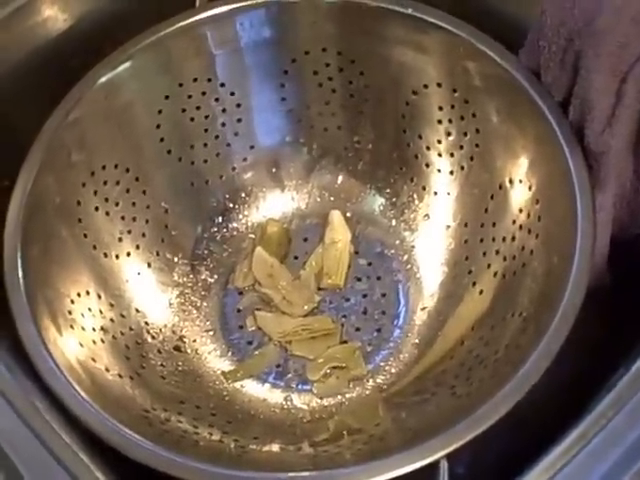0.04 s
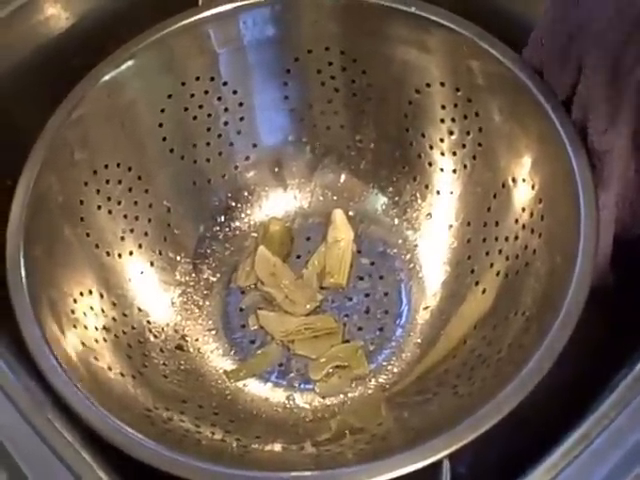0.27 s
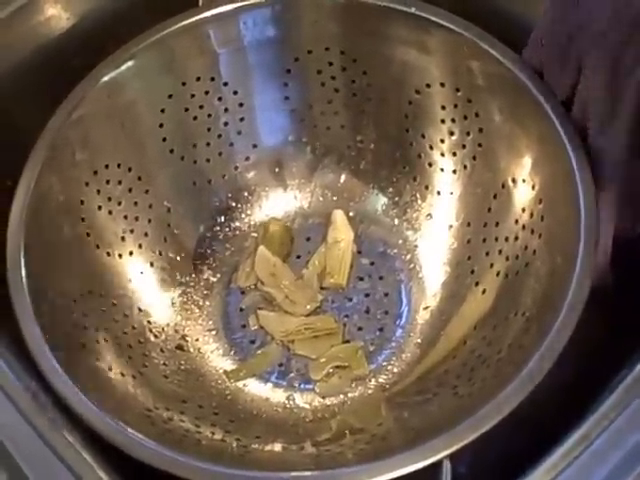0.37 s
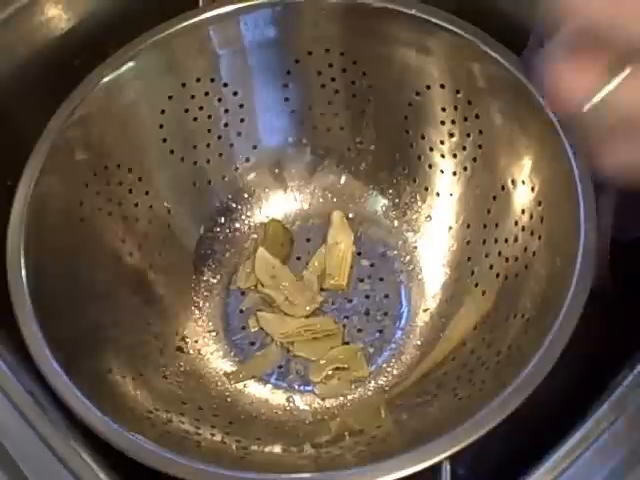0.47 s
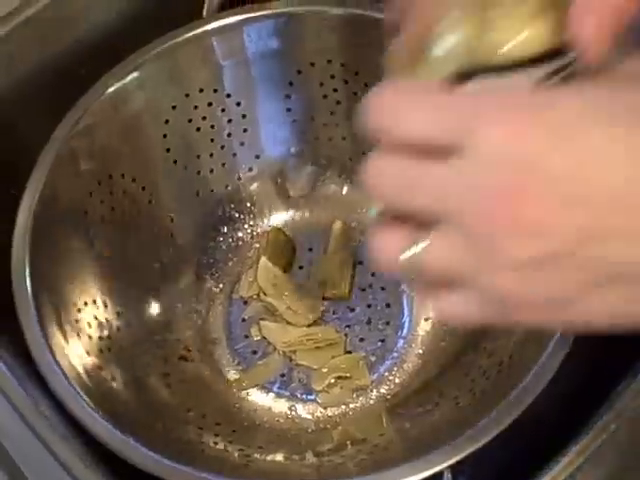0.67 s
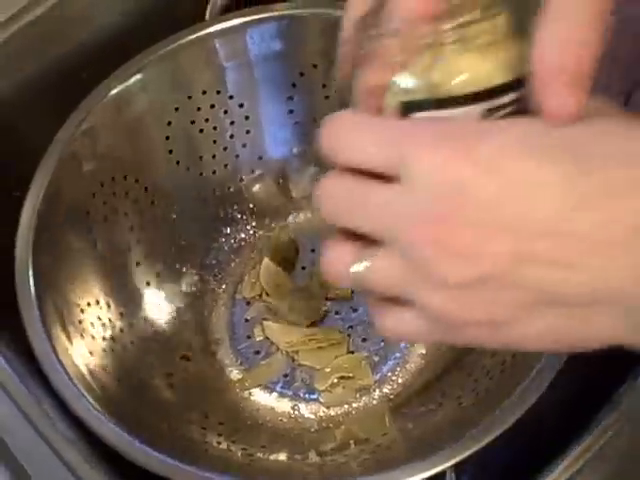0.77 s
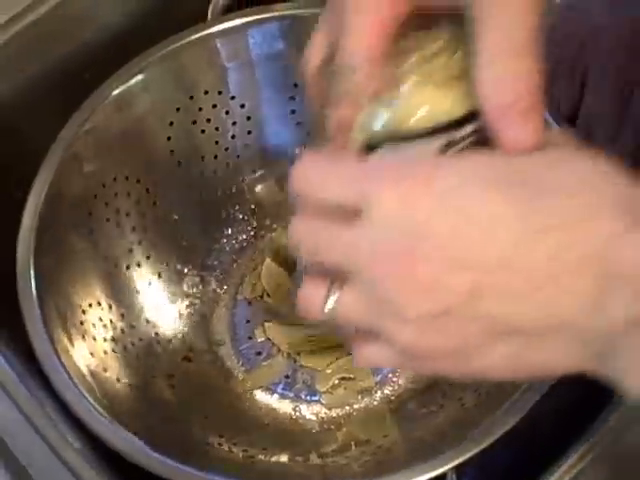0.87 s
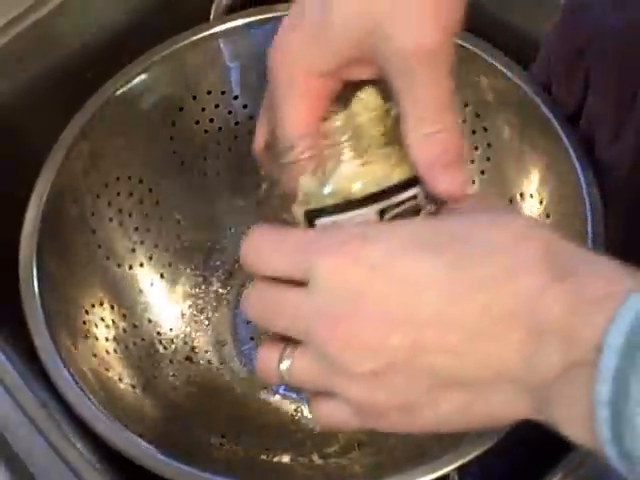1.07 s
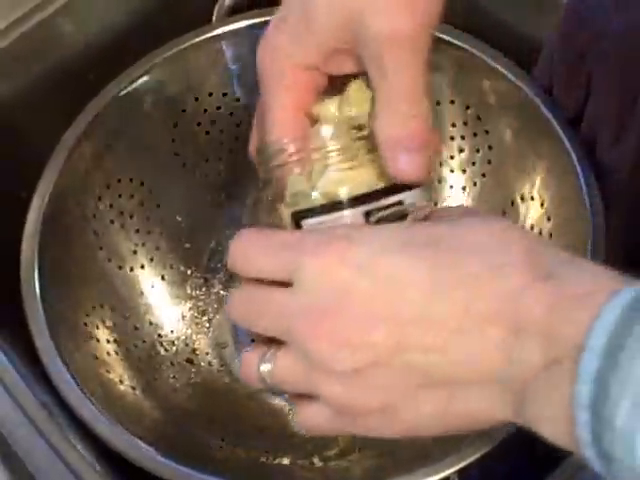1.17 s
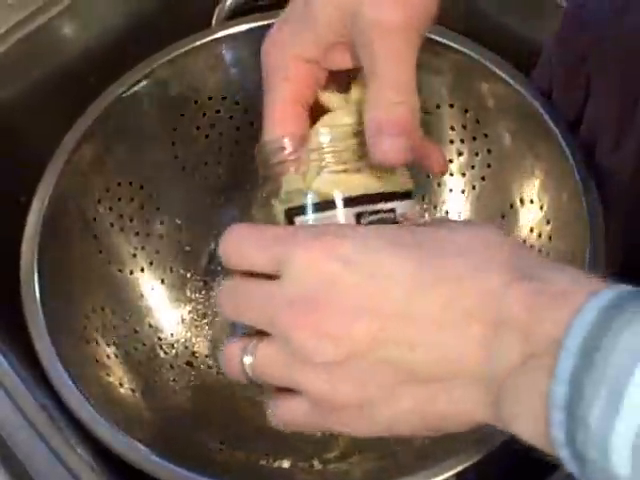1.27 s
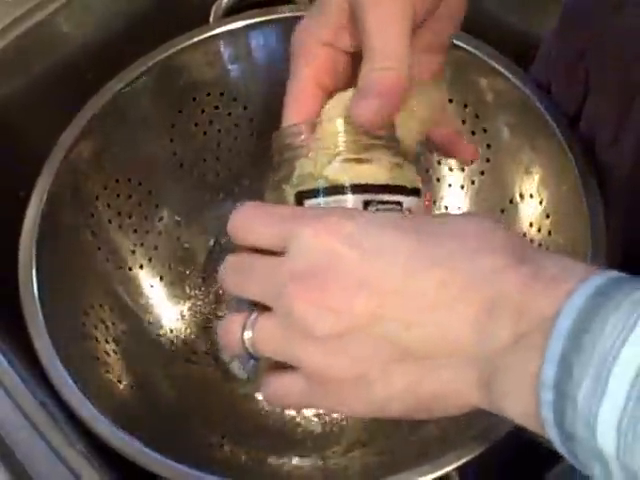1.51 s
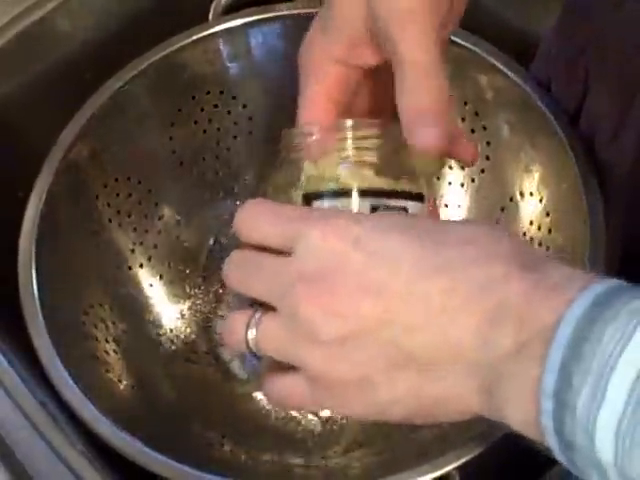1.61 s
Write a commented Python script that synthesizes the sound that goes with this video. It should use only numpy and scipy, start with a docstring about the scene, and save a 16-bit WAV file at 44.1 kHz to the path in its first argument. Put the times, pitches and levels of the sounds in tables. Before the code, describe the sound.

A metal lid thuds and clatters sharply in a small kitchen, followed by faint squishy wet ticks

```python
"""A metal jar lid is worked loose with dull knocks, drops and clatters on the counter of a small hard kitchen.
Each hit is a short rattle of banded noise; the blows also ring decaying modes, and a colander hums.
Wet fingers then dig into pickled vegetables: fizz of tiny bubbles, rubbed glass and resonant brine ticks.
Faint finger slides come first, over rumble and microphone hiss; a steep limiter flattens the loudest hits."""
import sys
import numpy as np
from scipy import signal
from scipy.fft import rfft, irfft, next_fast_len
from scipy.io import wavfile

SR = 44100
rng = np.random.default_rng(int(sys.argv[2]) if len(sys.argv) > 2 else 0)


def materialize(psi):
    """Save the field psi as 16-bit PCM at rate SR to the path in sys.argv[1].

    A 1-D psi becomes a single channel; in a 2-D psi each row is a channel.
    """
    bounded = np.clip(np.atleast_2d(psi).T, -1, 1)
    quanta = np.round(bounded * 32767).astype(np.int16)
    wavfile.write(sys.argv[1], SR, quanta)


N = 72765

# Room rumble and microphone hiss: f/Hz, spectrum level/dB
FLOOR_SPECTRUM = [(12, -29.5), (20, -2.5), (88, -4.5), (221, -13.5), (1320, -24), (1560, -25.5),
                  (1690, -25), (2000, -27.5), (3310, -32), (15800, -36.5)]
FLOOR_DB = -54  # overall rms

# Fingers sliding on the lid: t/s, mid level/dB, treble level/dB
HANDLING_LEVELS = [(.045, -83, -73), (.07, -62, -48.5), (.1, -62, -59.5), (.142, -59, -60),
                   (.19, -60.5, -64), (.21, -52, -75), (.24, -57, -76)]
# Resonances under the fingers, first the mid one, then the treble ones: f/Hz, width/Hz
GRIP_RESONANCES = [(1950, 420), (4900, 270), (6280, 450)]
SKIN_HZ, SKIN_WIDTH_HZ, SKIN_MIX = 4400, 3330, 1.6  # mix is relative to the treble resonances

# Kitchen reverb time: f/Hz, t60/s
KITCHEN_DECAY = [(100, 0.367), (500, 0.33), (2000, 0.33), (5000, 0.28), (10000, 0.21), (15000, 0.23)]
KITCHEN_DB, WET_ROOM_DB = -6, -12.5  # room sends of the hits and of the brine ticks
BUILD_S = 0.003  # time constant of the room's swell
PREDELAY = 180  # samples

# Dull knocks as the lid comes loose, and a faint late one:
# t/s, level/dB, one colour level/dB per knock band, contact t60/s
KNOCK_HITS = [(0.241, 1, -26, -21, -17, -15.5, -15.5, -16, -16.5, -17, -23.5, -26, 0.048),
              (0.248, -5, -51, -19.5, -13, -12.5, -12, -8, -13, -20, -33, -26, 0.038),
              (0.289, -13.5, -23, -16.5, -17, -13, -11.5, -9.5, -12, -20.5, -23, -27, 0.11),
              (0.3676, 1, -30.5, -20.5, -18, -16.5, -11.5, -11, -12.5, -18, -18.5, -15, 0.05),
              (0.478, -1, -42, -34, -35, -23.5, -13.5, -13, -13.5, -26.5, -21, -23.5, 0.064),
              (0.523, -1, -36, -36, -31, -29.5, -24, -13, -14.5, -13.5, -17, -22.5, 0.045),
              (1.585, -38, -33, -22, -14, -15.5, -10, -27, -16, -27, -19, -27.5, 0.06)]
# Colour bands of a knock: low f/Hz, high f/Hz
KNOCK_COLOUR_BANDS = [(90, 160), (160, 350), (350, 800), (800, 1150), (1150, 1600), (1600, 2300),
                      (2300, 3300), (3300, 4200), (4200, 10000), (10000, 15900)]
HOLLOW_HZ, HOLLOW_WIDTH_HZ, HOLLOW_DB = 616, 70, 3.5  # air in the jar's neck colours the knocks
RISE_S = 0.000976  # attack time constant of contacts and rings
CLICK = 0.33  # gain of the first touch, against the rattle that follows

# Blows of the lid: t/s, level/dB, one colour level/dB per blow band, contact t60/s,
# then one ring level/dB per group of modes
BLOW_HITS = [(0.6685, 3.5, -19, -19.5, -20, -4, -8, -13.5, -12.5, 0.037, -31.5, -24, -43, -15.5, -11, -42, -17, -40, -8),
             (.678, 0.5, -33, -23, -16, -11.5, -5, -8, -8, 0.055, -37, -52, -42, -29, -4, -10.5, -20, -13, -29),
             (0.796, -3.5, -20, -21.5, -22.5, -13.5, -15, -15.5, -8, 0.034, -18, -30, -20.5, -23.5, -45, -41, -23.5, -18, -40),
             (.885, -11, -20, -7, -15, -10.5, -16, -19.5, -23, 0.045, -17.5, -36, -29, -19, -38, -49, -41, -24, -32),
             (.907, -17, -22, -34, -32, -21, -11, -27, -11, 0.044, -38, -54, -25, -19, -33, -20, -14, -32, -11),
             (0.9202, -7, -29, -35, -19, -8, -18.5, -14, -37, 0.032, -45, -25, -13, -8.5, -47, -43, -31, -15, -15),
             (.939, -16.5, -13, -9, -29, -19, -33, -35, -32, 0.028, -9, -50, -31, -12, -46, -46, -42, -42, -33),
             (1.007, -18.5, -23, -27, -19.5, -14, -12, -19, -9, 0.014, -12.5, -35, -24, -11, -42, -40, -34, -16, -16),
             (1.058, -2, -37, -23.5, -30, -22, -20, -20.5, -20.5, 0.034, -43, -24, -10.5, -18.5, -41, -43, -56, -21.5, -21),
             (1.076, -17.5, -36, -35, -22, -8, -36, -22, -25, 0.023, -37, -43, -28, -8, -42, -48, -38, -40, -26),
             (1.098, -18, -54, -21, -36, -4, -39, -14, -8, 0.016, -32, -15, -37, -14, -40, -40, -32, -19, -30)]
# Colour bands of a blow: low f/Hz, high f/Hz
BLOW_COLOUR_BANDS = [(75, 160), (160, 350), (350, 1100), (1100, 2300), (2300, 4200), (4200, 10000),
                     (10000, 15900)]
# Modes of counter and lid: f/Hz, level/dB before the blow's weighting, t60/s
LID_MODES = [(193.5, -4.5, 0.2), (276.6, -2, .05), (492.7, -2, 0.12), (624, 4.5, 0.061), (1320, -2, 0.083),
             (1362, -10.5, 0.18), (1549, -2.5, 0.11), (1670, 5, 0.058), (1820, -8, 0.12), (1905, 4, 0.04),
             (4030, -1, 0.055), (4855, 2.5, 0.078), (5980, 4.5, 0.053), (8490, 0.5, .05),
             (11860, -2, 0.037), (13020, 0.5, 0.0364)]
# Edges between the groups of modes that a blow weights together: f/Hz
RING_GROUP_EDGES = [400, 1100, 1450, 1850, 3000, 4200, 5400, 7000]
RING_DRIFT = 0.019  # phase step in radians per sample at 1 kHz, growing with pitch
RING_SPREAD_DB = 1.5  # random spread of each mode from blow to blow
RING_ROOM_DB = -2.5  # the ring reaches the room less than the contact does

# Nudges of the colander: t/s, level/dB, length before damping/s
COLANDER_NUDGES = [(0.798, -31, 0.072), (0.922, -34.5, 0.042), (1.261, -41, 0.01)]
COLANDER_HZ, COLANDER_T60, DAMPING_S = 745, 0.6, 0.0054  # damping is a time constant

# Rustle of the wet pieces: t/s, low fizz level/dB, high fizz level/dB, hands on glass level/dB
RUSTLE_LEVELS = [(0.902, -74, -40, -36), (1, -54, -39, -39), (1.13, -52, -78, -44), (1.17, -47, -34.5, -44),
                 (1.209, -51, -43, -51), (1.235, -37, -33.5, -44), (1.289, -44.5, -38.5, -48.5),
                 (1.32, -54, -47, -54), (1.361, -74, -54, -57), (1.405, -60.5, -58, -63.5),
                 (1.43, -50, -44, -53), (1.49, -65, -56, -64.5), (1.541, -71, -65, -61),
                 (1.565, -63, -53, -61.5), (1.582, -57, -50.5, -56), (1.631, -50.5, -54, -57.5),
                 (1.65, -53, -57, -69)]
# Low and high fizz: centre f/Hz, spread in natural log of f
FIZZ_VOICES = [(5200, 0.16), (10000, 0.48)]
FIZZ_SPREAD_DB = 4  # bubble level per natural-log unit of a random draw
FIZZ_CYCLES, FIZZ_NOISE = 2.1, 0.99  # cycles per bubble decay constant; hiss gain against bubbles
# Colour of hands rubbing on glass: f/Hz, spectrum level/dB
RUB_SPECTRUM = [(60, -4), (180, 4), (350, -6), (550, 2.5), (1000, -16), (1800, -8), (3000, -16),
                (6000, -68)]

# Wet brine ticks: t/s, level/dB, centre f/Hz, width of each of two filter passes/Hz, t60/s
BRINE_TICKS = [(.962, -23, 7650, 1020, 0.019), (0.969, -29, 13600, 3000, 0.024),
               (0.995, -34, 12530, 4000, 0.018), (1.007, -26, 12000, 500, .012),
               (1.021, -25, 14600, 1490, 0.011), (1.048, -27, 13500, 1500, .01),
               (1.052, -32, 8000, 9000, 0.034), (1.133, -26.5, 9150, 2380, 0.027),
               (1.168, -22.5, 13700, 2500, 0.036), (1.168, -31.5, 9700, 2000, 0.04),
               (1.232, -28, 7000, 9000, 0.036), (1.250, -37, 9350, 8000, 0.014),
               (1.235, -28.5, 7050, 9100, 0.018), (1.262, -23, 10000, 7000, 0.014),
               (1.270, -20.5, 3770, 895, 0.018), (1.272, -23.5, 6240, 3020, 0.022),
               (1.311, -31, 8280, 1220, 0.008), (1.334, -30.5, 6540, 914, 0.007),
               (1.365, -41, 6200, 900, 0.023), (1.412, -33, 11760, 8400, 0.046),
               (1.419, -25.5, 8530, 4000, 0.013), (1.422, -34, 6260, 2050, 0.081),
               (1.463, -39, 10600, 3890, 0.054), (1.513, -35, 6900, 1490, .01),
               (1.57, -32.5, 12160, 4980, 0.028), (1.571, -40.5, 4660, 900, 0.093),
               (1.599, -40.5, 5440, 1200, 0.086), (1.615, -38.5, 6540, 2570, 0.039),
               (1.646, -27.5, 8700, 5000, 0.004)]

TOP_HZ = 15800  # band limit, and ceiling for bubble and tick pitches


def amp(db):
    """Turns dB into linear gain."""
    return 10 ** (np.asarray(db) / 20)


def unit(x):
    """Scales x to rms 1."""
    return x / np.sqrt(np.mean(x ** 2) + 1e-20)


def along(points, hz):
    """Reads a curve of (f/Hz, value) points on a log frequency axis."""
    f, v = np.transpose(points)
    return np.interp(np.log(hz + 1), np.log(f + 1), v)


def gains(rows):
    """Draws one fader move per dB column, nearly silent before the first row."""
    s, *columns = np.transpose(rows)
    t = np.arange(N) / SR
    return [amp(np.interp(t, s, column, left=-120)) for column in columns]


def filtered(x, response):
    """Shapes the spectrum of x by a response of frequency, without shifting phase."""
    m = next_fast_len(N + SR // 2)
    return irfft(rfft(x, m) * response(np.fft.rfftfreq(m, 1 / SR)), m)[:N]


def add(track, s, x):
    """Mixes x into track at time s."""
    part = track[round(s * SR):][:len(x)]
    part += x[:len(part)]


def floor():
    """Room rumble and microphone hiss: steady noise shaped by one spectrum curve."""
    noise = rng.standard_normal(N)
    return amp(FLOOR_DB) * unit(filtered(noise, lambda hz: amp(along(FLOOR_SPECTRUM, hz))))


def resonant_noise(centre, width):
    """Friction noise exciting one broad resonance."""
    def peak(f):
        return f * width / np.abs(centre ** 2 - f ** 2 + 1j * f * width)
    return filtered(rng.standard_normal(N), peak)


def handling():
    """Fingers slide faintly on the lid before it gives, exciting broad resonances."""
    mid, *high = [resonant_noise(centre, width) for centre, width in GRIP_RESONANCES]
    skin = resonant_noise(SKIN_HZ, SKIN_WIDTH_HZ)
    treble = unit(unit(sum(high)) + SKIN_MIX * unit(skin))
    mid_gain, treble_gain = gains(HANDLING_LEVELS)
    gate = np.arange(N) < HANDLING_LEVELS[-1][0] * SR  # silent from the last row on
    return gate * (mid_gain * unit(mid) + treble_gain * treble)


def kitchen(x):
    """The room's answer: a fresh noise tail in which each frequency dies at its own speed."""
    hz, t, z = signal.stft(rng.standard_normal(SR // 2), SR, nperseg=256)
    decay = amp(-60 * t / along(KITCHEN_DECAY, hz)[:, None])
    tail = signal.istft(z * decay, SR, nperseg=256)[1]
    tail = tail * (1 - np.exp(-np.arange(len(tail)) / SR / BUILD_S))
    return signal.fftconvolve(np.pad(x, (PREDELAY, 0)), tail / np.linalg.norm(tail))


def add_in_room(track, s, near, far, send_db):
    """Mixes the direct sound and the room's answer to its far version."""
    add(track, s, near)
    add(track, s, amp(send_db) * kitchen(far))


def causal(bands, colour_db, size=4096):
    """Minimum-phase impulse response that gives each band its level, with no pre-ring."""
    points = []
    for (lo, hi), db in zip(bands, colour_db):
        density_db = db - 10 * np.log10(2 * (hi - lo) / SR)  # spread over the band's width
        points += [(lo * 1.08, density_db), (hi / 1.08, density_db)]
    points = [(30, points[0][1] - 30)] + points
    spectrum = amp(along(points, np.fft.rfftfreq(size, 1 / SR)))
    cepstrum = irfft(np.log(spectrum), size)
    cepstrum[1:size // 2] *= 2  # fold the time-reversed half forward
    cepstrum[size // 2 + 1:] = 0
    return irfft(np.exp(rfft(cepstrum)), size)


def contact(bands, colour_db, t60):
    """Near: a click and short dying rattle in coloured bands; far: one pulse of that colour for the room."""
    t = np.arange(SR // 4) / SR
    shape = amp(-60 * t / max(t60, .004)) * (1 - np.exp(-t / RISE_S))
    pulse = np.linalg.norm(shape) * signal.unit_impulse(len(t), round(RISE_S * SR))
    rattle = shape * rng.standard_normal(len(t))
    push = np.array([rattle + CLICK * pulse, pulse])
    return signal.fftconvolve(push, causal(bands, colour_db)[None], axes=1)[:, :len(t)]


def hollow(x):
    """Adds the resonance of the air in the jar's neck to x."""
    b, a = signal.iirpeak(HOLLOW_HZ, HOLLOW_HZ / HOLLOW_WIDTH_HZ, SR)
    return x + amp(HOLLOW_DB) * signal.lfilter(b, a, x)


def knocks():
    """Dull knocks: contact noise coloured by the hollow neck, with no lid ring."""
    out = np.zeros(N)
    for s, db, *colour_db, t60 in KNOCK_HITS:
        near, far = [amp(db) * hollow(x) for x in contact(KNOCK_COLOUR_BANDS, colour_db, t60)]
        add_in_room(out, s, near, far, KITCHEN_DB)
    return out


def ring(hz, db, t60, drift=RING_DRIFT):
    """One dying mode: a decaying sine whose phase wanders at random by the drift."""
    t = np.arange(SR // 4) / SR
    wander = np.cumsum(rng.standard_normal(len(t))) * drift * hz / 1000
    return amp(db - 60 * t / t60) * np.sin(2 * np.pi * hz * t + wander) * (1 - np.exp(-t / RISE_S))


def blows():
    """Clatter of the lid: each blow rattles and excites groups of modes in its own balance."""
    out, n = np.zeros(N), len(BLOW_COLOUR_BANDS)
    for s, db, *columns in BLOW_HITS:
        colour_db, t60, group_db = columns[:n], columns[n], columns[n + 1:]
        modes = 0
        for hz, mode_db, mode_t60 in LID_MODES:
            weight_db = group_db[np.searchsorted(RING_GROUP_EDGES, hz)]
            modes = modes + ring(hz, mode_db + weight_db + rng.normal(0, RING_SPREAD_DB), mode_t60)
        near, far = contact(BLOW_COLOUR_BANDS, colour_db, t60)
        to_room = amp(db) * (far + amp(RING_ROOM_DB) * modes)
        add_in_room(out, s, amp(db) * (near + modes), to_room, KITCHEN_DB)
    return out


def colander():
    """The nudged colander hums on one steady mode, then is damped after its listed length."""
    out, t = np.zeros(N), np.arange(SR // 4) / SR
    for s, db, length in COLANDER_NUDGES:
        damping = np.exp(-np.maximum(t - length, 0) / DAMPING_S)
        hum = damping * ring(COLANDER_HZ, db, COLANDER_T60, drift=0)
        add_in_room(out, s, hum, hum, KITCHEN_DB)
    return out


def fizz(hz, spread, count=4500):
    """Tiny bubbles of scattered pitch and size over a band of hiss, rms 1."""
    draw, k = rng.random((count, 2)), np.arange(160)
    f = np.minimum(hz * np.exp(spread * rng.standard_normal((count, 1))), TOP_HZ)
    size = amp(-FIZZ_SPREAD_DB * np.log(draw[:, 1:] + .03))
    grain = size * np.sin(2 * np.pi * f * k / SR) * np.exp(-k * f / SR / FIZZ_CYCLES)
    start = (draw[:, :1] * N).astype(int)
    bubbles = np.bincount((start + k).ravel(), grain.ravel(), N)[:N]
    hiss = filtered(rng.standard_normal(N), lambda w: np.exp(-(np.log((w + 1) / hz) / spread / 2) ** 2))
    return unit(unit(bubbles) + FIZZ_NOISE * unit(hiss))


def rustle():
    """Fingers squeeze the wet pieces into two fizzes and rub the glass as shaped noise."""
    low_gain, high_gain, rub_gain = gains(RUSTLE_LEVELS)
    low, high = [fizz(hz, spread) for hz, spread in FIZZ_VOICES]
    glass = unit(filtered(rng.standard_normal(N), lambda hz: amp(along(RUB_SPECTRUM, hz))))
    return low_gain * low + high_gain * high + rub_gain * glass


def ticks():
    """A film of brine snaps: a dying puff of noise through one resonance, applied twice."""
    out, t = np.zeros(N), np.arange(SR // 10) / SR
    for s, db, hz, width, t60 in BRINE_TICKS:
        b, a = signal.iirpeak(min(hz, TOP_HZ), hz / width, SR)
        noise = rng.standard_normal(len(t))
        puff = unit(signal.lfilter(b, a, signal.lfilter(b, a, noise)))
        tick = amp(db - 60 * t / max(t60, .002)) * puff
        add_in_room(out, s, tick, tick, WET_ROOM_DB)
    return out


def scene():
    """Mixes all layers to one channel."""
    return (floor() + handling() + knocks() + blows() + colander() + rustle() + ticks())[None]


def record(dry):
    """A steep limiter flattens peaks towards 0.93, then a low-pass sets the band limit."""
    x = dry[0] / (1 + np.abs(dry[0] / .93) ** 8) ** (1 / 8)
    return filtered(x, lambda hz: 1 / (1 + (hz / TOP_HZ) ** 120))[None]


dry = scene()
out = record(dry)
materialize(out)
```